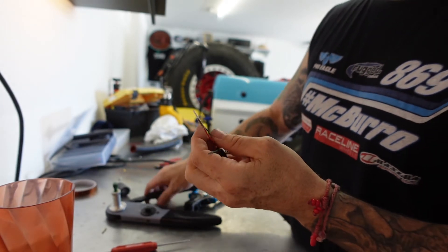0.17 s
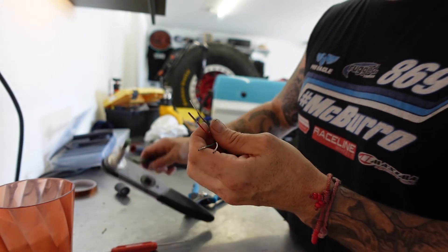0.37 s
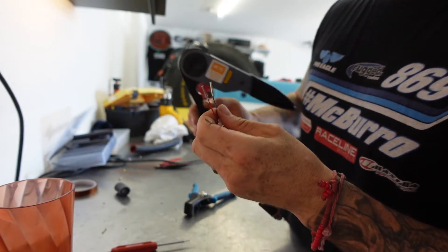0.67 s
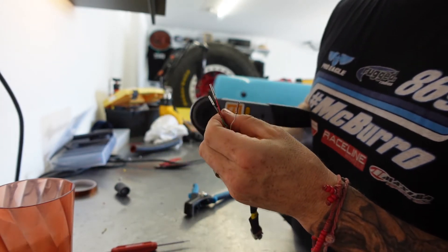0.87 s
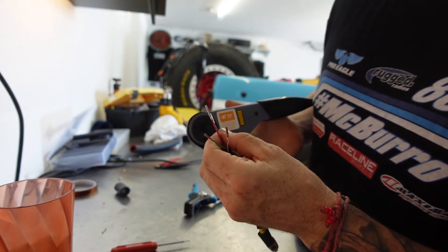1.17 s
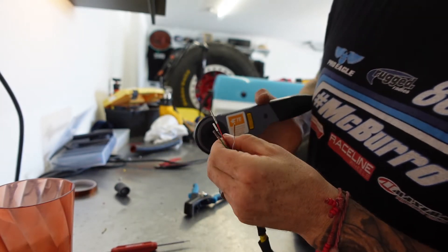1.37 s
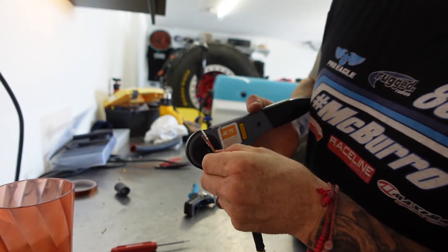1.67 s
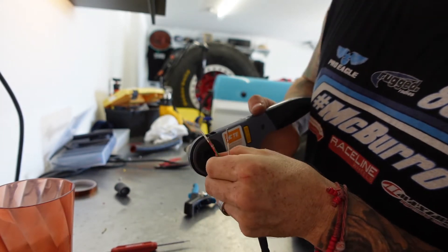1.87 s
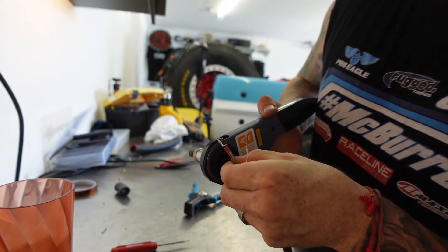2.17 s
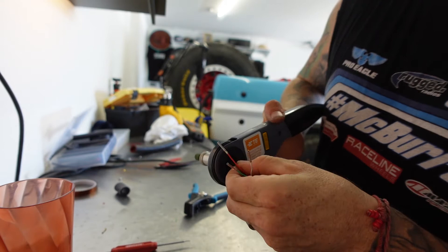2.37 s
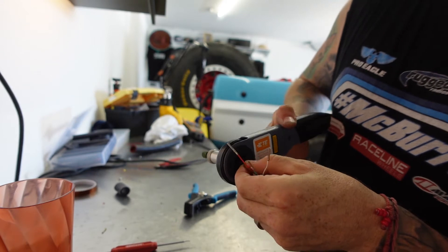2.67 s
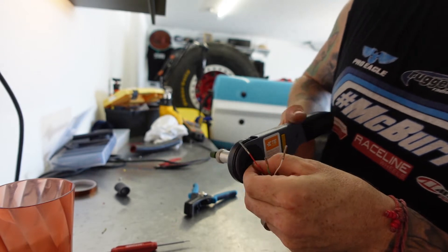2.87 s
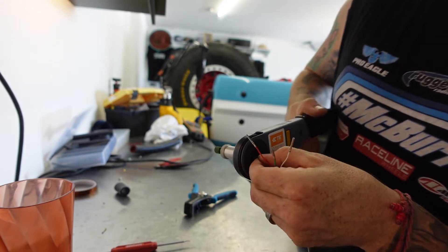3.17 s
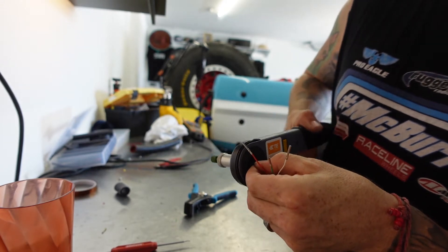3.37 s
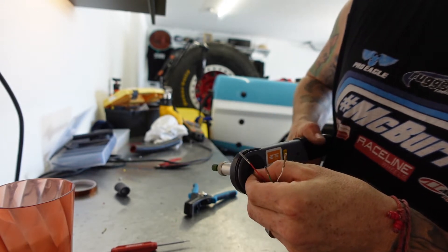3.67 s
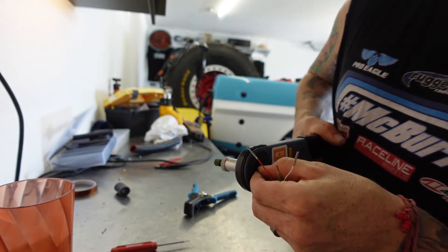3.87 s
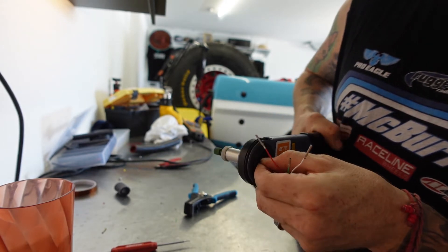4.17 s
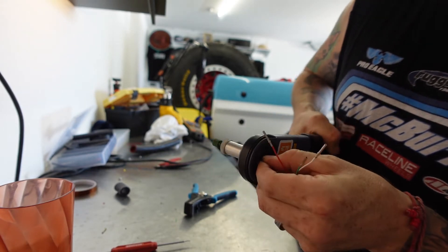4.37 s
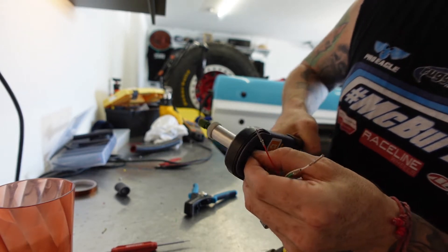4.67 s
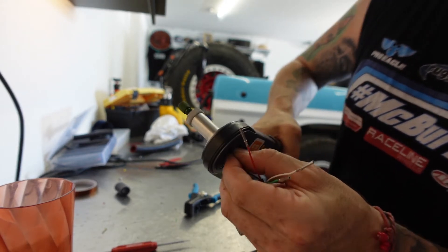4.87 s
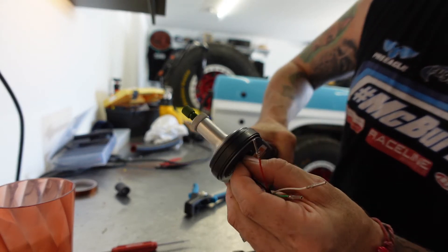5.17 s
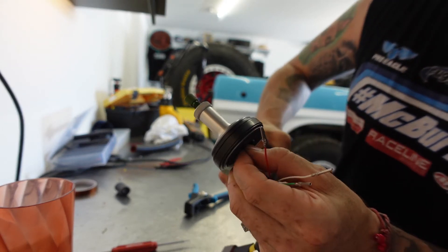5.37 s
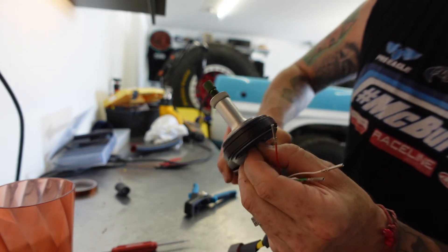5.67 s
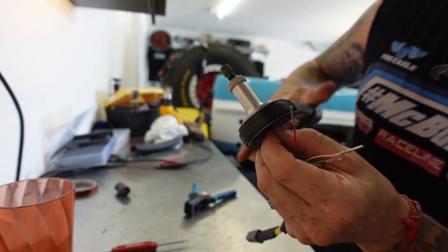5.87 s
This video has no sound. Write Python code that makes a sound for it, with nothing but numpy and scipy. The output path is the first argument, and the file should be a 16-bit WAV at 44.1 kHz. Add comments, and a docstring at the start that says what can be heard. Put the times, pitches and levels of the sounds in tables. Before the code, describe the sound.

Close-up in a quiet workshop: tool knocks and rattles, faint wire ticks, then a quickening run of bright ratchet clicks ending in sharp snaps.

```python
"""In a small workshop with a low ventilation hum, a ratcheting crimp tool is lifted off a bench and squeezed.
Dull knocks, clacking links, sprung jaws and a pawl dropping over twelve teeth are short noise bursts
ringing through filters that stand for wood, grips or steel. Rubbing is grainy noise, squeaks are rising
tones, and ticking wire strands are faint bursts. Fading noise makes the room's echo; steady noise makes its air."""
import sys
import numpy as np
from scipy import signal
from scipy.fft import rfft, irfft, next_fast_len
from scipy.io import wavfile
from scipy.ndimage import uniform_filter1d, map_coordinates

SR = 44100
rng = np.random.default_rng(int(sys.argv[2]) if len(sys.argv) > 2 else 0)


def inscribe(sig):
    """Save sig as 16-bit PCM at rate SR to the path in sys.argv[1].

    A 1-D sig is mono; a 2-D sig holds one channel per row.
    Samples are clipped to [-1, 1] before scaling.
    """
    pcm = np.round(np.clip(np.atleast_2d(sig).T, -1, 1) * 32767)
    wavfile.write(sys.argv[1], SR, pcm.astype(np.int16))


N = 265923  # length of the scene in samples
SIZE = 8192  # length of one blow in samples
T = np.arange(SIZE) / SR  # time within a blow, s
HZ = np.fft.rfftfreq(SIZE, 1 / SR)  # frequencies of a blow's spectrum

# colour of the hollow grips, bumped or rubbed: f/Hz, level/dB
GRIP_COLOUR = [(200, -42.5), (450, -12.5), (620, 9.5), (800, 4.5), (1000, -4), (1500, -4), (2200, -11),
               (4000, -30), (12000, -47)]


def amp(db):
    """Turn decibels into a gain."""
    return 10 ** (np.asarray(db) / 20)


def unit(x):
    """Scale a sound to an rms (average strength) of 1."""
    return x / np.sqrt(np.mean(x ** 2) + 1e-20)


def along(points, hz):
    """Read a curve of (f/Hz, value) points, joined by straight lines on a logarithmic frequency axis."""
    f, value = np.transpose(points)
    return np.interp(np.log(hz + 1), np.log(f + 1), value)


def add(track, s, sound):
    """Mix a sound into a track at s seconds, cutting off what runs past the end."""
    start = max(round(s * SR), 0)
    part = sound[:, :max(N - start, 0)]
    track[:, start:start + part.shape[1]] += part


def causal(gain):
    """Turn a gain curve into a body's response that rings only after the blow (minimum phase)."""
    cepstrum = irfft(np.log(np.maximum(gain, 1e-6)))
    # folding the second half onto the first puts all ringing after time zero
    cepstrum[1:SIZE // 2] *= 2
    cepstrum[SIZE // 2 + 1:] = 0
    return np.exp(rfft(cepstrum))


def peaks(modes):
    """Stand resonances (f/Hz, width/Hz, level/dB) on a flat response; narrow ones ring longer."""
    power = 1
    for hz, width, db in modes:
        power = power + amp(db) ** 2 * 2 / (1 + (2 * (HZ - hz) / width) ** 2)
    return np.sqrt(power)


def pair(alike, size):
    """Make left and right white noise with a given likeness (one number, or one per frequency)."""
    mid, side = rfft(rng.standard_normal((2, size)))
    turn = np.arccos(np.clip(alike, -1, 1)) / 2
    left = np.cos(turn) * mid + np.sin(turn) * side
    right = np.cos(turn) * mid - np.sin(turn) * side
    return irfft([left, right], size)


def rush(spectrum, likeness):
    """Make steady coloured stereo noise of rms 1."""
    size = next_fast_len(N, True)
    hz = np.fft.rfftfreq(size, 1 / SR)
    noise = rfft(pair(along(likeness, hz), size))
    return unit(irfft(noise * amp(along(spectrum, hz)), size)[:, :N])


def blow(gain, rise, hold, t60, alike):
    """Let a contact chatter and die away through a body (times in s); its strongest 3 ms have rms 1."""
    # t60 is the time in which the chatter falls by 60 dB
    fade = amp(-60 * np.maximum(T - hold, 0) / t60)
    chatter = pair(alike, SIZE) * (1 - np.exp(-T / rise)) * fade
    sound = irfft(rfft(chatter) * causal(gain))
    power = uniform_filter1d(np.mean(sound ** 2, axis=0), size=132)
    return sound / np.sqrt(power.max())


def weighted(gain, bands):
    """Share a blow's power among (low/Hz, high/Hz, share/dB) bands; frequencies outside keep the rest."""
    shape, rest = np.zeros(len(HZ)), np.ones(len(HZ), bool)
    for low, high, db in bands:
        inside = (HZ >= low) & (HZ < high)
        shape[inside] = db - 10 * np.log10(np.sum(gain[inside] ** 2))
        rest &= ~inside
    left_over = max(1 - sum(amp(db) ** 2 for _, _, db in bands), 0.15)
    shape[rest] = 10 * np.log10(left_over / np.sum(gain[rest] ** 2))
    # smoothing softens the steps between bands
    return gain * amp(uniform_filter1d(shape, size=70))


def ventilation():
    """Moving air is wide coloured noise; the fan motor's blurred hum is low, narrow noise."""
    # colour of the moving air: f/Hz, level/dB
    air_colour = [(15, -49.5), (25, -23.5), (48, -13), (76, -16.5), (108, -2), (141, -11.5), (180, -6),
                  (416, -13), (840, -5), (962, -8.5), (1260, -7.5), (2350, -20), (4370, -24), (9570, -31),
                  (16000, -32.5)]
    # colour of the motor hum: f/Hz, level/dB
    hum_colour = [(85, -48), (104, -10), (119, -4), (134, -16), (180, -6.5), (240, -32), (500, -120)]
    # how alike left and right are: f/Hz, likeness (1 = the same)
    air_likeness = [(40, 0.84), (120, 1), (250, 0.2), (500, 0.41), (1000, 0.2), (4000, 0.055), (12000, 0.1)]
    air_db, hum_db = -60.92, -72.5
    return amp(air_db) * rush(air_colour, air_likeness) + amp(hum_db) * rush(hum_colour, air_likeness)


def workshop(x):
    """The walls return fading noise, treble dying first; a fresh tail every 0.09 s stands for the tool moving."""
    # time in which the echo falls by 60 dB: f/Hz, t60/s
    echo_t60 = [(200, 0.61), (1300, 0.58), (4500, 0.37), (8000, 0.33), (15000, .26)]
    # how alike the echo is left and right: f/Hz, likeness (1 = the same)
    tail_likeness = [(120, 0.97), (400, 0.93), (2500, 0.5), (6000, 0.9), (12000, .35)]
    out, stretch, size = np.zeros((2, N)), SIZE // 2, SIZE * 2
    likeness = along(tail_likeness, np.fft.rfftfreq(size, 1 / SR))
    for start in range(0, N, stretch):
        hz, t, z = signal.stft(pair(likeness, size), SR, nperseg=256)
        fade = amp(-60 * t / along(echo_t60, hz)[:, None])
        build_up = 1 - np.exp(-t / 0.002)
        tail = signal.istft(z * fade * build_up, SR, nperseg=256)[1]
        tail = tail / np.linalg.norm(tail[0])
        add(out, start / SR, signal.fftconvolve(x[:, start:start + stretch], tail, axes=1))
    return out


def knocks():
    """Dull blows: the tool's weight rocking on the bench until it is lifted, and fingers bumping hollow grips."""
    # the tool on the bench, grabbed and then lifted: t/s, level/dB (before the 6 dB cut below)
    thuds = [(.153, -33.5), (.356, -44)]
    # soft bumps on the grips: t/s, level/dB (before the 2 dB cut below)
    bumps = [(2.645, -43.5), (2.709, -45.5), (3.293, -50.5), (3.419, -45.5)]
    # colour of the bench: f/Hz, level/dB
    bench_colour = [(40, -48), (80, -13), (115, 4.5), (190, .5), (250, -4), (380, -16.5), (900, -15),
                    (2000, -20), (5000, -29), (12000, -51)]
    out = np.zeros((2, N))
    (grabbed, grab_db), (lifted, _) = thuds
    # the tool's far end lands 8 ms after the first blow, and weaker
    heel = [(grabbed + 0.008, grab_db - 13)]
    rock_s = 0.033  # time from one rocking knock to the next
    rock_times = np.arange(grabbed + rock_s, lifted - rock_s / 2, rock_s)
    # each rocking knock is half a decibel stronger than the one before
    rocking = [(s, -47.5 + 0.5 * k) for k, s in enumerate(rock_times)]
    bench = amp(along(bench_colour, HZ))
    for s, db in list(thuds) + heel + rocking:
        add(out, s, amp(db - 6) * blow(bench, rise=0.00074, hold=0.0019, t60=0.12, alike=0.99))
    grip = amp(along(GRIP_COLOUR, HZ))
    for s, db in bumps:
        add(out, s, amp(db - 2) * blow(grip, rise=0.00069, hold=0.0068, t60=0.058, alike=0.85))
    return out


def friction(strokes, gain, grain_db):
    """Strokes swell and fade; uneven catching and slipping, 260 random strengths a second, shakes a body."""
    t = np.arange(N) / SR
    power = sum(amp(db) ** 2 * np.exp(-((t - s) / half) ** 2 * 2) for s, half, db in strokes)
    slips = map_coordinates(rng.standard_normal(N), [t * 260], order=1)
    scrape = amp(grain_db * slips) * pair(0.58, size=next_fast_len(N, True))[:, :N]
    rubbed = signal.fftconvolve(scrape, irfft(causal(gain))[None], axes=1)[:, :N]
    return np.sqrt(power) * unit(rubbed)


def rubbing():
    """Metal slides on metal and skin and makes the steel ring; the palm drags on the duller grip."""
    # slides of metal: t of the middle/s, half length/s, level/dB
    slides = [(.33, 0.27, -64.5), (.975, 0.017, -48.5), (1.42, 0.25, -56), (1.85, 0.23, -68.5),
              (3.43, 0.099, -69), (5.89, 0.045, -48.5)]
    # drags of the palm: t of the middle/s, half length/s, level/dB
    drags = [(1.185, 0.017, -58), (2.68, .046, -69), (3.43, 0.092, -54.5)]
    # colour of sliding metal: f/Hz, level/dB
    sliding_colour = [(300, -11), (900, 5.5), (2000, 2.5), (3300, 3.5), (5000, 3), (6500, -11),
                      (10000, -14), (16000, -24)]
    steel_rings = [(1826, 82, 4.5), (2100, 60, 1.6), (2904, 33, 8.1)]  # f/Hz, width/Hz, level/dB
    steel = amp(along(sliding_colour, HZ)) * peaks(steel_rings)
    grip = amp(along(GRIP_COLOUR, HZ))
    return friction(slides, steel, grain_db=2) + friction(drags, grip, grain_db=0.5)


def wire():
    """Bare wire strands tick faintly and unevenly as they brush the pin and are fed into it."""
    # strands brushing the pin: t/s, level/dB (before the 12.5 dB cut below)
    ticks = [(1.776, -49.5), (2.129, -45), (2.8609, -50.5), (3.4144, -47.5), (5.8102, -45)]
    # colour of the strands: f/Hz, level/dB
    strand_colour = [(1000, -28), (3000, 1), (5200, 1.5), (7000, -7), (10000, -6.5), (16000, -28)]
    out = np.zeros((2, N))
    feed_s, step_s = 1.755, 0.033  # start of the feeding, usual time between its ticks
    feed = []
    for k, (late, hard) in enumerate(rng.standard_normal(size=(8, 2))):
        feed.append((feed_s + step_s * (k + 0.28 * late), -53.5 + 2.5 * hard))
    strands = amp(along(strand_colour, HZ))
    for s, db in list(ticks) + feed:
        add(out, s, amp(db - 12.5) * blow(strands, rise=0.00092, hold=0.0031, t60=0.032, alike=0.65))
    return out


def squeaks():
    """Steel sliding under load sings briefly, rising in pitch as it speeds up, with a rough, jittery tone."""
    # squeaks: t/s, length/s, first f/Hz, level/dB
    squeak_list = [(.355, 0.03, 1851, -48), (3.544, 0.01, 2415, -40), (4.444, 0.0055, 2880, -36),
                   (5.032, .012, 2540, -46), (5.089, 0.007, 2690, -35)]
    out = np.zeros((2, N))
    for s, length, first_hz, db in squeak_list:
        progress = np.minimum(T / length, 1)
        # the pitch climbs to 1.35 times its start, and jitters at every sample
        hz = first_hz * 1.35 ** progress + 900 * rng.standard_normal(SIZE)
        tone = np.sin(2 * np.pi * np.cumsum(hz) / SR)
        swell = np.sin(np.pi * progress)
        add(out, s, amp(db) * (swell * tone)[None])
    return out


def links():
    """Loose links and the pin strike the steel frame, small parts brighter; the closing hand damps its rings."""
    # clacks: t/s, level/dB, main ring f/Hz, how freely it rings/dB, length of the chatter/s
    clacks = [(.281, -50, 3640, 6, 0.018), (.367, -41.5, 2280, 20, 0.0071), (.577, -50, 2210, 16, 0.0044),
              (.5938, -33, 4720, 18, 0.0016), (.619, -29.5, 3720, -11, 0.0015),
              (0.7977, -22.5, 4780, 13, 0.0024), (.931, -38, 3140, 21.5, .008),
              (0.989, -31, 3050, 25, 0.0061), (.998, -28, 3650, -4, 0.0025),
              (1.0832, -32.5, 3440, 14, 0.0024), (1.292, -49.5, 2010, 5, .003),
              (1.387, -42, 2400, -3, 0.0067), (1.422, -38.5, 3230, 11, 0.0016),
              (2.3058, -43.5, 4600, 0, 0.0024), (2.3553, -28.5, 4360, 8, 0.0023),
              (3.488, -51.5, 2880, 8, .002), (3.6217, -50, 2930, 4, 0.0018), (5.235, -36.5, 2180, 6, .004),
              (5.7448, -34.5, 2740, 3, .002), (5.888, -44, 2020, 16, .004)]
    # colour of a clack: f/Hz, level/dB
    link_colour = [(250, -53), (700, -12.5), (1300, -1.5), (1700, -4.5), (2100, 3), (2600, -5.5),
                   (3200, 1.5), (5000, -4.5), (6400, -6), (7500, -5), (11000, -7.5), (15500, -22.5)]
    # narrow rings of the frame: f/Hz, width/Hz, level against the main ring/dB
    frame_rings = [(1190, 33, -2.5), (1640, 80, -4.5), (2020, 31, -10), (3060, 54, -5), (3650, 70, -10.5),
                   (4690, 64.5, -6), (5690, 65, -8), (6640, 80, -7)]
    gripped_s = 1.05  # from here on the hand is closed
    usual_hz, usual_db = 3340, -31  # main ring and strength of a middling link
    out = np.zeros((2, N))
    for s, db, ring_hz, ring_db, chatter_s in clacks:
        # the closed hand widens the rings and muffles knock and clack
        damping, muffle_db = (4.5, -1.5) if s > gripped_s else (1, 0)
        octaves = np.log2(ring_hz / usual_hz)
        stronger = db - usual_db
        # shares of the low knock, the middle clack and the bright edge
        knock_db = -12 - 4 * octaves - 0.18 * stronger + muffle_db
        clack_db = -2.5 - 10 * octaves - 0.06 * stronger + muffle_db
        edge_db = -13.5 + 12 * octaves - 0.052 * stronger
        rings = [(ring_hz, 240, ring_db)]
        for hz, width, level in frame_rings:
            rings.append((hz, width * damping, level + ring_db - 10 * np.log10(damping)))
        body = amp(along(link_colour, HZ)) * peaks(rings)
        body = weighted(body, [(0, 1800, knock_db), (1800, 3700, clack_db), (7000, SR, edge_db)])
        add(out, s, amp(db) * blow(body, rise=0.00025, hold=chatter_s, t60=0.051, alike=0.746))
    return out


def jaws():
    """The return spring throws the jaws on their stop, three contacts each; a hard snap knocks the whole frame."""
    # snaps: t/s, level of the hardest contact/dB, main ring f/Hz, time between contacts/s, rise per contact/dB
    snaps = [(3.5562, -26, 5360, 0.0055, -10.5), (5.9213, -20.5, 4840, 0.0031, 3),
             (6.0106, -18, 5600, .0064, 4)]
    # colour of the jaws: f/Hz, level/dB
    jaw_colour = [(250, -41), (550, -28), (820, -16.5), (1050, -21.5), (1600, -19), (2150, -20),
                  (2650, -21), (3100, -8.5), (3900, -6), (4500, 4), (5600, 4), (6300, -3), (7200, -9),
                  (11000, -9.5), (15500, -23.5)]
    # rings of the jaws: f/Hz, width/Hz, level over the broad colour/dB
    jaw_rings = [(798, 56, 9), (2210, 290, 10.5), (2880, 200, -3), (5450, 500, -16)]
    usual_db = -19.5  # an ordinary snap
    out, steel = np.zeros((2, N)), amp(along(jaw_colour, HZ)) * peaks(jaw_rings)
    contacts = np.arange(3)
    for s, db, ring_hz, gap_s, swell_db in snaps:
        stronger = db - usual_db
        # shares of the low knock, the middle clack and the bright edge
        knock_db = -20 + 1.24 * stronger
        clack_db = -15 - 0.89 * stronger
        edge_db = -9.5 - 0.074 * stronger
        body = steel * peaks([(ring_hz, 700, -1)])
        body = weighted(body, [(0, 1800, knock_db), (1800, 3700, clack_db), (7000, SR, edge_db)])
        swell = swell_db * contacts
        for at, level in zip(s + gap_s * contacts, db + swell - swell.max()):
            add(out, at, amp(level) * blow(body, rise=0.0001, hold=0.001, t60=0.058, alike=0.72))
    return out


def ratchet():
    """The pawl snaps over each tooth and rings its spring anew; load and weak drops both bring out the clack."""
    # pawl drops, one for each tooth: t/s, level/dB, main ring f/Hz, share of the spring's ring/dB
    drops = [(4.2149, -25.5, 4900, -10.5), (4.3235, -22, 5450, -9), (4.4484, -20, 5400, -10.5),
             (4.5122, -20, 4420, -11), (4.6092, -20, 5100, -7), (4.76, -20, 4330, -9.5),
             (4.8764, -19.5, 4800, -6.5), (4.9682, -18.5, 4580, -13.5), (5.0452, -17.5, 4850, -7),
             (5.0915, -19, 4500, -6), (5.1593, -19, 4150, -3), (5.234, -21.5, 4400, -4.5)]
    # colour of the pawl: f/Hz, level/dB
    pawl_colour = [(400, -47.5), (1500, -38), (2100, -16.5), (2800, -15.5), (3300, -19.5), (4500, -4),
                   (5500, -5.5), (7000, -16), (8200, -5), (8800, -15), (10300, -23.5), (11500, -14),
                   (13200, -29), (15500, -26.5)]
    # rings of pawl and spring: f/Hz, width/Hz, level over the broad colour/dB (before the scatter below)
    spring_rings = [(2226, 71, -3), (2814, 180, 2.5), (3440, 210, 6.5), (4530, 39, 0), (4680, 45, 0.5),
                    (4740, 29, -2), (4950, 70, 3.5), (8100, 66, 1.5), (8290, 160, 4.5)]
    usual_db = -20  # an ordinary drop
    out, alike = np.zeros((2, N)), along([(3000, 0.91), (12000, 0.37)], HZ)
    for tooth, (s, db, ring_hz, spring_db) in enumerate(drops):
        weaker = usual_db - db
        # shares of the clack and the bright edge shift tooth by tooth as the load grows
        clack_db = -17 + 0.39 * tooth + 0.93 * weaker
        edge_db = -11.5 - 0.27 * tooth + 0.3 * weaker
        rings = [(ring_hz, 300, 1)]
        for hz, width, level in spring_rings:
            rings.append((hz, width, level + 2 * rng.standard_normal()))
        body = amp(along(pawl_colour, HZ)) * peaks(rings)
        body = weighted(body, [(0, 3200, clack_db), (7000, 9000, spring_db), (9000, SR, edge_db)])
        add(out, s, amp(db) * blow(body, rise=0.00024, hold=0.0015, t60=0.036, alike=alike))
    return out


def scene():
    """The tool sounds close to the microphones, with the room's echo and the ventilation around it."""
    tool = knocks() + rubbing() + wire() + squeaks() + links() + jaws() + ratchet()
    echo = amp(-10.5) * workshop(tool) * amp([[-0.4], [0.4]])  # a little stronger on the right
    return tool + echo + ventilation()


def record(dry):
    """The two microphones differ a little in colour, and nearly nothing passes above a steep treble limit."""
    # difference between the microphones: f/Hz, left minus right/dB
    lean = [(200, 0), (700, -3), (2500, -0.3), (5000, -0.5), (9000, 0), (13000, 1)]
    top_hz = 15900  # treble limit
    size = next_fast_len(N + SIZE, True)
    hz = np.fft.rfftfreq(size, 1 / SR)
    colour = amp(np.outer([0.5, -0.5], along(lean, hz)))
    limit = 1 / (1 + (hz / top_hz) ** 120)
    return irfft(rfft(dry, size) * colour * limit, size)[:, :N]


dry = scene()
out = record(dry)
inscribe(out)
```